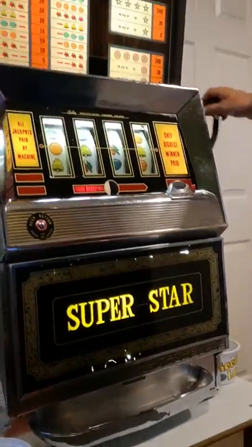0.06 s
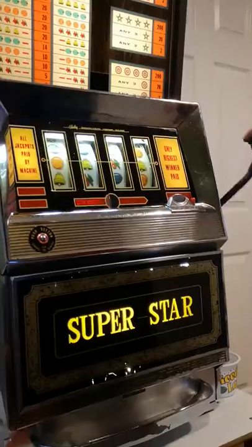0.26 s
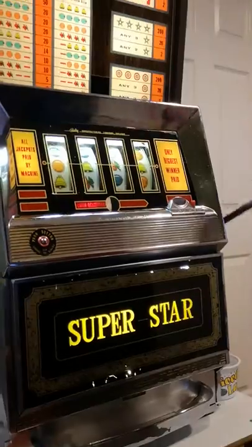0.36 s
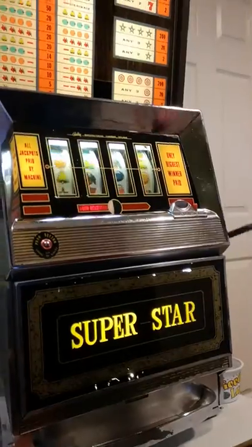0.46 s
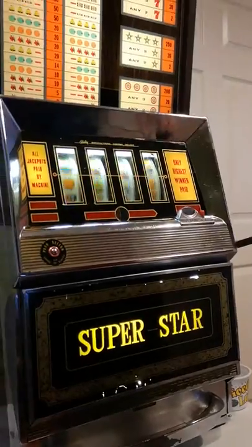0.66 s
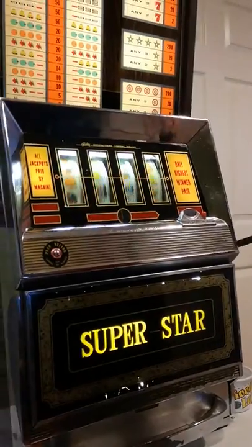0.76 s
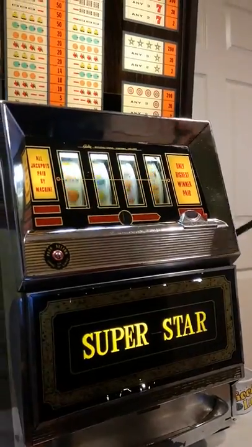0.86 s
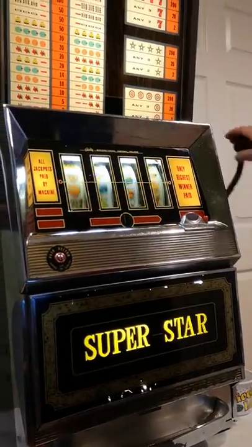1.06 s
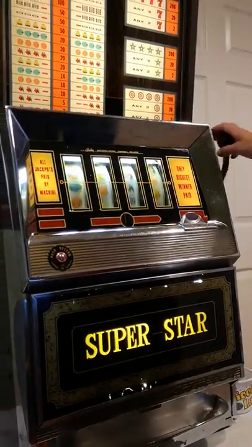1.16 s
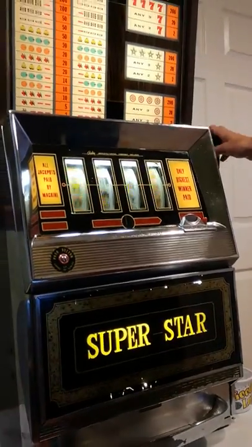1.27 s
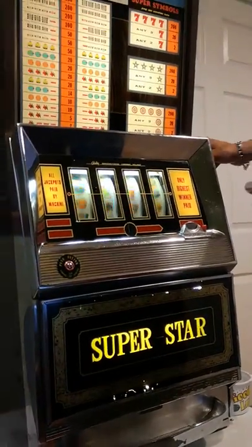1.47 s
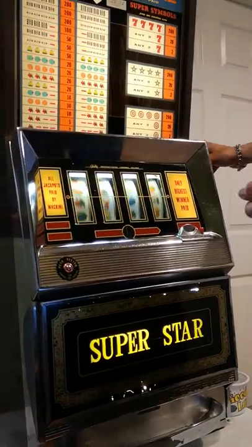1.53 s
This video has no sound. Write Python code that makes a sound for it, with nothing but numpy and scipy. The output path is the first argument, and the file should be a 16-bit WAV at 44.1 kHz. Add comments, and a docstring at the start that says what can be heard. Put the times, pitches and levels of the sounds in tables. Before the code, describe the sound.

An old mechanical slot machine's lever is pulled close by in a small, quiet room. Rapid metal ratchet clicks run from 0.1 to 0.4 seconds. A latch snaps near 0.5, then the linkage slams with a heavy cabinet thump, the loudest moment. The reels hum softly from 0.6. The lever scrapes and squeaks around 0.9, ratchets back and clangs on its stop near 1.2, with a faint click at 1.6.

```python
"""The lever of an old mechanical slot machine, pulled close by in a small room.
A steel pawl clatters down the ratchet, a latch snaps and the linkage slams home, kicking off
the reels with a heavy cabinet thump. Each clack is a crack, three rebounds and a ringing tail.
The lever scrapes, squeaks and ratchets back to its stop while the spinning mechanism hums.
Faint room tone sits underneath, and a noise suppressor ducks the treble in the quiet spots."""
import sys
import numpy as np
from scipy import signal
from scipy.fft import rfft, irfft, next_fast_len
from scipy.io import wavfile
from scipy.ndimage import uniform_filter1d, map_coordinates

SR = 44100
rng = np.random.default_rng(int(sys.argv[2]) if len(sys.argv) > 2 else 0)


def unload_audio(sound):
    """Save the sound as a 16-bit wav file, at the path given as the first command line argument."""
    columns = np.transpose(np.atleast_2d(sound))
    # keep every value between -1 and 1, then stretch to whole-number steps
    steps = np.round(np.clip(columns, -1, 1) * 32767)
    wavfile.write(sys.argv[1], SR, steps.astype(np.int16))


N = 70560
T = np.arange(N) / SR
TAIL, CRACK = T[:SR * 3 // 4], T[:2048]  # time axes for a hit's ring and its attack

# pawl clicks on the down stroke (t/s, level/dB)
PULL_HITS = [(.149, -28), (.187, -28.5), (.221, -28.5), (.255, -30), (.295, -31), (.335, -30.5),
             (.378, -29), (.429, -28)]
# latch snaps of the reel drive (t/s, level/dB)
LATCH_HITS = [(.467, -18.5), (.483, -26)]
# bright clicks of the reel release (t/s, level/dB)
RELEASE_HITS = [(.5695, -28), (1.586, -43)]
# linkage slamming into its stops (t/s, level/dB)
SLAM_HITS = [(.556, -21.5), (.572, -22.5), (.585, -24.5), (.628, -34)]
# pawl clicks on the way back (t/s, level/dB)
RETURN_HITS = [(.978, -30), (.987, -34.5), (1.011, -28), (1.044, -28), (1.064, -31.5), (1.082, -28),
               (1.101, -31), (1.125, -28), (1.175, -27), (1.234, -25), (1.328, -30), (1.345, -34.5)]
# clang of the lever on its upper stop (t/s, level/dB)
STOP_HITS = [(1.243, -29)]
# tone of the down-stroke clicks (f/Hz, level/dB)
PULL_EQ = [(200, -21), (272, -7.5), (340, -10.5), (820, -11.5), (1050, -6), (1900, -1.5), (2660, -1.5),
           (3000, -8.5), (5230, -8.5), (9250, -16.5), (15500, -35.5)]
# tone of the latch (f/Hz, level/dB)
LATCH_EQ = [(220, -15), (867, -12), (1020, -7.5), (1900, -3.5), (3730, -10.5), (4900, -6), (8000, -17),
            (11300, -26), (15500, -60)]
# tone of the release (f/Hz, level/dB)
RELEASE_EQ = [(2000, -5.5), (5500, -5.5), (9000, -7), (15000, -23)]
# tone of the slams (f/Hz, level/dB)
SLAM_EQ = [(40, -3), (100, 5.5), (550, -3), (1150, -1), (2500, -2.5), (3600, -7.5), (7000, -14.5),
           (15000, -51)]
# tone of the return clicks (f/Hz, level/dB)
RETURN_EQ = [(300, -17), (400, -7.5), (500, -15.5), (900, -19), (1080, -14), (1830, -8), (2810, -8),
             (3350, -12), (6250, -11.5), (10700, -25), (15500, -44.5)]
# modes of the drive pawl and its linkage (f/Hz, level/dB)
DRIVE_MODES = [(1771, -1), (1857, 3.5), (1911, 4.5), (2700, -1), (4624, -6)]
# modes of the return pawl (f/Hz, level/dB)
RETURN_MODES = [(1793, 2), (1986, 2), (2126, 0), (2837, -1), (3714, -10.5), (4802, -4)]
# base decay of the cabinet and room wash (f/Hz, t60/s)
WASH_DECAY = [(2200, 0.55), (5000, 0.52), (9000, 0.5), (15000, 0.63)]
# knocks on the cabinet (t/s, level/dB)
THUMP_HITS = [(0.106, -31), (0.234, -35.5), (.546, -17), (0.574, -16.5), (0.648, -31.5)]
# low modes of the cabinet (f/Hz, level/dB, t60/s)
CABINET_MODES = [(63, -2, 0.11), (125.2, 8, 0.089), (152.5, -3.5, 0.22), (216, -3, 0.13)]
# fader moves of the sliding lever (t/s, scrape level/dB, rumble level/dB)
SLIDE_FADERS = [(0, -54.5, -61.5), (.1, -45.5, -42.5), (.28, -48, -41), (.68, -40, -36.5), (.83, -53, -49),
                (.92, -41.5, -43.5), (1.0, -41, -49.5), (1.42, -47.5, -50), (1.5, -63.5, -51),
                (1.6, -58, -50)]
# tone of the lever's scrape and its clang on the stop (f/Hz, level/dB)
LEVER_EQ = [(200, -6.5), (1200, -7), (1700, 1), (2700, -1), (3400, -16), (7400, -17), (9000, -28.5),
            (15000, -42)]
# tone of the shaking case (f/Hz, level/dB)
RUMBLE_EQ = [(22, 5.5), (40, -16), (68, -4.5), (165, 0.5), (200, -8.5), (270, -3), (900, -80)]
# pivot and linkage squeaks (t/s, length/s, start f/Hz, end f/Hz, level/dB, pitch jitter/fraction)
SQUEAKS = [(-.015, 0.093, 1610, 1955, -47.5, 0.023), (0.005, 0.082, 1560, 1533, -49, .012),
           (.503, 0.033, 1948, 1703, -27.5, .012), (.868, 0.08, 3120, 3020, -46.5, 0.013),
           (.895, 0.071, 2650, 2500, -44, 0.049), (0.928, 0.015, 1781, 1690, -36.5, 0.007),
           (0.934, 0.0637, 2420, 2176, -38, 0.056)]
# fader moves of the spinning mechanism (t/s, level/dB)
SPIN_FADER = [(.66, -30.5), (.72, -35.5), (.78, -40), (.83, -52), (.91, -35), (.97, -47), (1.06, -40.5),
              (1.2, -45.5), (1.4, -43.5), (1.6, -52)]
# partials of its hum (f/Hz, level/dB)
HUM_PARTIALS = [(102.5, -13), (153.5, -1)]
# room tone (f/Hz, level/dB)
ROOM_EQ = [(25, 22), (150, -30), (300, 3), (2000, -17), (15000, -55)]
# stereo image of the noise layers (f/Hz, left-right correlation)
STEREO_IMAGE = [(60, .99), (200, .8), (550, -.15), (1200, .25), (2200, -.1)]
# colour difference of the microphone ports (f/Hz, left minus right level/dB)
PORT_BALANCE = [(400, .3), (1100, -2), (2000, .8), (4200, -2.5), (8000, 3.5), (12000, .3)]


def mechanism():
    """Steel hits steel: ratchet down, latch, reel release, slam, ratchet back, upper stop."""
    return (
        clacks(PULL_HITS, PULL_EQ, DRIVE_MODES, crack_db=4.5, crack_s=.002, steel_db=-10.5, decay=1)
        + clacks(LATCH_HITS, LATCH_EQ, DRIVE_MODES, crack_db=1.5, crack_s=.0032, steel_db=-16, decay=1)
        + clacks(RELEASE_HITS, RELEASE_EQ, DRIVE_MODES,
                 crack_db=5, crack_s=.0031, steel_db=-29, decay=.55)
        + clacks(SLAM_HITS, SLAM_EQ, DRIVE_MODES, crack_db=.5, crack_s=.0021, steel_db=-16, decay=.77)
        + clacks(RETURN_HITS, RETURN_EQ, RETURN_MODES,
                 crack_db=-1, crack_s=.0024, steel_db=-10, decay=.7)
        + clacks(STOP_HITS, LEVER_EQ, RETURN_MODES, crack_db=-5, crack_s=.0037, steel_db=-11, decay=.79))


def clacks(hits, eq, modes, crack_db, crack_s, steel_db, decay):
    """Metal hits crack, rebound three times and ring on; decay scales the ring times."""
    out = np.zeros((2, N))
    body, shared = wash(eq, decay), .75  # this share of the wash's power is the same on every hit
    for start, db in hits:
        ring = np.sqrt(shared) * body + np.sqrt(1 - shared) * wash(eq, decay)
        ring += amp(steel_db) * steel(modes, decay)
        add(out, start, amp(db) * ring * (1 - np.exp(-TAIL / .0018)))
        # chatter: roughly 17 ms apart, each rebound 2 dB below the last
        rebounds = [(.017 * (k + rng.uniform(-.67, .39)), 1 - 2 * k) for k in range(1, 4)]
        for delay, trim_db in [(.0001, 0)] + rebounds:
            envelope = np.exp(-CRACK / crack_s) * (1 - np.exp(-CRACK / .00042))
            add(out, start + delay, amp(db + crack_db + trim_db) * envelope * noise(eq, len(CRACK)))
    return out


def steel(modes, decay, base_t60=.33):
    """A pawl's modes ring, struck a little differently each time."""
    ring = np.zeros((2, len(TAIL)))
    for hz, db in modes:
        gain = amp(db + rng.normal(0, 2.5, (2, 1)))
        ring += gain * np.sin(2 * np.pi * (hz * TAIL + rng.random((2, 1))))
    return ring * amp(-60 * TAIL / (decay * base_t60))


def wash(eq, decay):
    """The dense ring of cabinet and room behind a hit."""
    hz, t, spectrum = signal.stft(noise(eq, len(TAIL)), SR, nperseg=256)
    t60 = decay * along(WASH_DECAY, hz)[:, None]
    _, ring = signal.istft(spectrum * amp(-60 * t / t60), SR, nperseg=256)
    return ring[:, :len(TAIL)]


def cabinet_thumps():
    """The low-end weight: heavy knocks ring the modes of the case."""
    out = np.zeros(N)
    boom = sum(amp(db - 60 * TAIL / t60) * np.sin(2 * np.pi * hz * TAIL) for hz, db, t60 in CABINET_MODES)
    attack = (1 - np.exp(-TAIL / .0021)) ** 2
    for start, db in THUMP_HITS:
        add(out, start, -amp(db) * boom * attack)
    return out


def lever_slide():
    """The moving lever scrapes with a gritty flutter and shakes the case."""
    scrape_db, rumble_db = faders(SLIDE_FADERS)
    scrape = amp(scrape_db + .76 * wobble(140)) * noise(LEVER_EQ)
    return scrape + amp(rumble_db) * noise(RUMBLE_EQ)


def squeaks(reverb_db=.5, reverb_t60=.36):
    """Short stick-slip glides, some clean and some rough, smeared by the room."""
    direct = np.zeros(N)
    for start, length, start_hz, end_hz, db, jitter in SQUEAKS:
        progress = np.clip((T - start) / length, 0, 1)
        pitch = (start_hz + (end_hz - start_hz) * progress) * (1 + jitter * wobble(900))
        envelope = amp(db + 2.5 * wobble(300)) * np.sin(np.pi * progress)
        direct += envelope * np.sin(2 * np.pi * np.cumsum(pitch) / SR)
    room = rng.standard_normal((2, len(TAIL))) * amp(-60 * TAIL / reverb_t60)
    reverb = signal.fftconvolve(direct[None], room / np.linalg.norm(room[0]), axes=1)[:, :N]
    return direct + amp(reverb_db) * reverb


def reel_hum(start_s=.6, rise_s=.06):
    """The spinning mechanism drones in the cabinet, wavering in level and pitch."""
    level_db, = faders(SPIN_FADER)
    drone = np.zeros(N)
    for hz, db in HUM_PARTIALS:
        gain = amp(db + wobble(14))
        speed = 1 + .006 * wobble(16)
        drone += gain * np.sin(2 * np.pi * hz * np.cumsum(speed) / SR)
    fade_in = np.clip((T - start_s) / rise_s, 0, 1)
    return fade_in * amp(level_db) * np.sqrt(2) * drone


def room_tone():
    """A faint, dark bed of steady noise."""
    return amp(-63) * noise(ROOM_EQ)


def noise(eq, size=N):
    """Coloured stereo noise of rms 1, centred in the bass and wide above."""
    hz = np.fft.rfftfreq(size, 1 / SR)
    spread = np.arccos(along(STEREO_IMAGE, hz)) / 2
    spectrum = rfft(rng.standard_normal((2, size))) * amp(along(eq, hz))
    mid, side = irfft(spectrum * [np.cos(spread), np.sin(spread)], size)
    stereo = np.array([mid + side, mid - side])
    return stereo / np.sqrt(np.mean(stereo ** 2) + 1e-20)


def amp(db):
    """Decibels to gain."""
    return 10 ** (np.asarray(db) / 20)


def along(points, hz):
    """Read (f/Hz, value) points on a log frequency axis."""
    freqs, values = np.transpose(points)
    return np.interp(np.log(hz + 1), np.log(freqs + 1), values)


def faders(rows):
    """One automation curve for each column after the time."""
    times, *columns = np.transpose(rows)
    return [np.interp(T, times, column) for column in columns]


def wobble(rate):
    """Smooth random modulation, rate knots a second."""
    return map_coordinates(rng.standard_normal(int(N * rate / SR) + 4), [T * rate])


def add(track, start, sound):
    """Mix a sound into a track at start seconds."""
    part = track[..., max(0, round(start * SR)):][..., :sound.shape[-1]]
    part += sound[..., :part.shape[-1]]


def noise_suppressor(mix, threshold_db=-55, crossover_hz=1800):
    """A soft expander ducks the treble while it is faint."""
    treble = signal.sosfiltfilt(signal.butter(2, crossover_hz, "highpass", fs=SR, output="sos"), mix)
    power = np.abs(uniform_filter1d(np.mean(treble ** 2, axis=0), size=600))
    gain = np.sqrt(power / (power + amp(threshold_db) ** 2))
    return mix - treble * (1 - gain)


def scene():
    """The machine up front, over a quiet room."""
    return mechanism() + cabinet_thumps() + lever_slide() + squeaks() + reel_hum() + room_tone()


def record(dry):
    """Master chain: noise suppressor, the colour of each microphone port, a brick-wall high cut."""
    size, high_cut_hz = next_fast_len(N + 8192), 15700
    hz = np.fft.rfftfreq(size, 1 / SR)
    ports = amp(along(PORT_BALANCE, hz) * np.array([[.5], [-.5]]))
    spectrum = rfft(noise_suppressor(dry), size)
    return irfft(spectrum * ports * (hz < high_cut_hz), size)[:, :N]


dry = scene()
out = record(dry)
unload_audio(out)
```